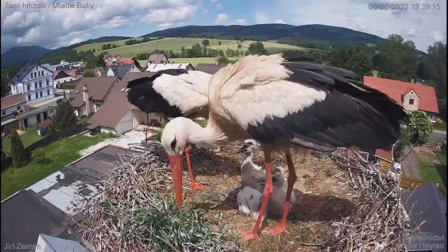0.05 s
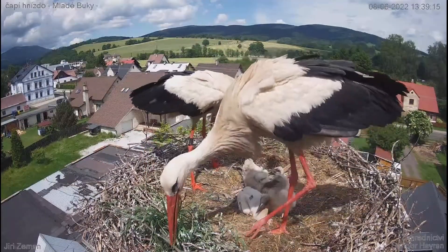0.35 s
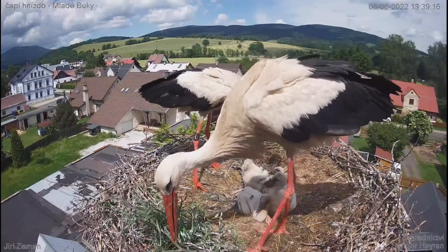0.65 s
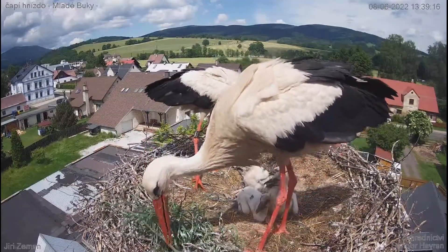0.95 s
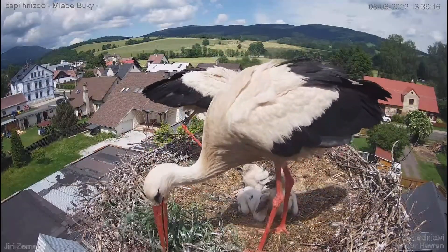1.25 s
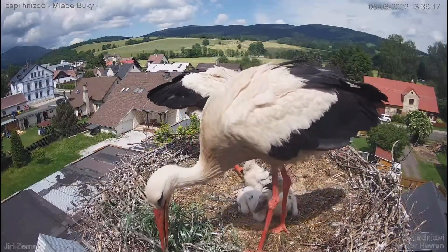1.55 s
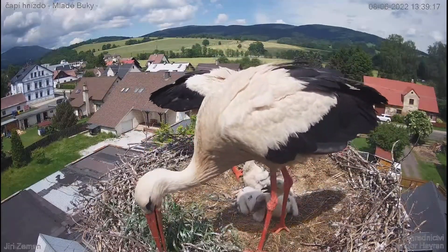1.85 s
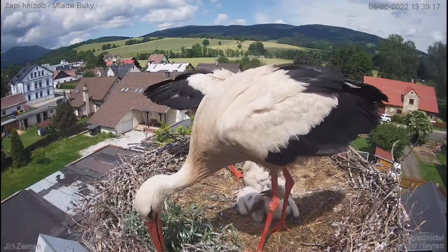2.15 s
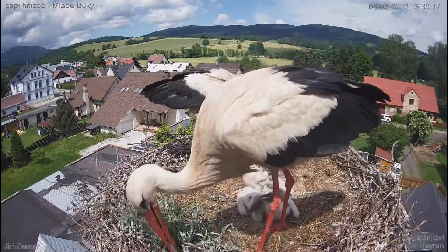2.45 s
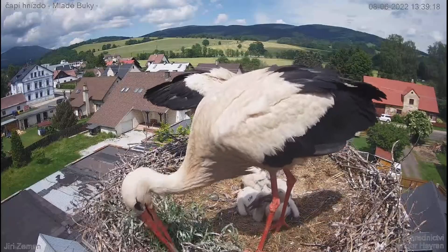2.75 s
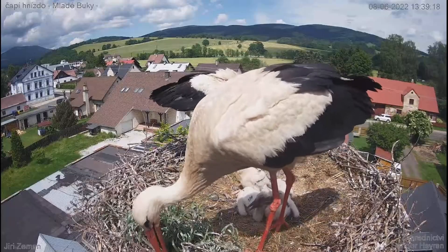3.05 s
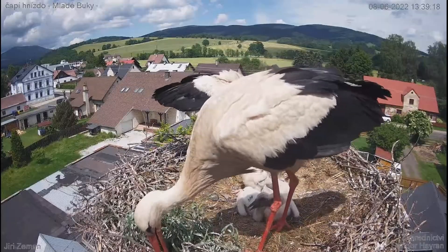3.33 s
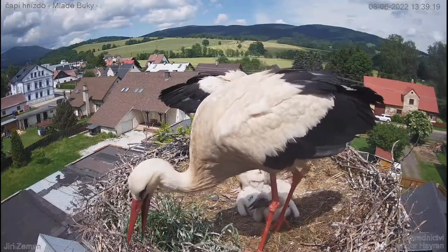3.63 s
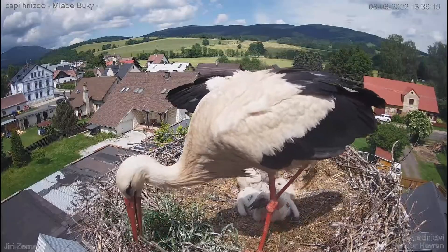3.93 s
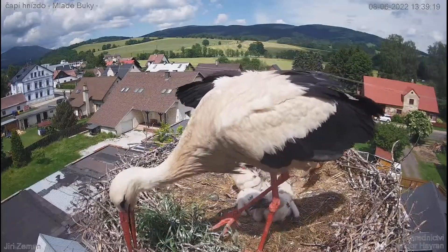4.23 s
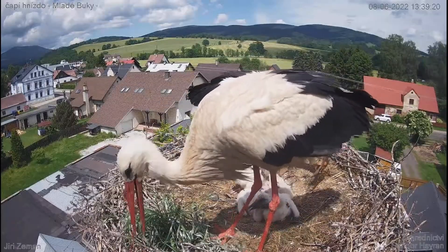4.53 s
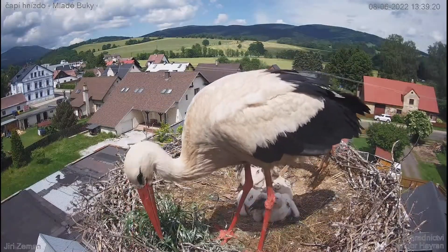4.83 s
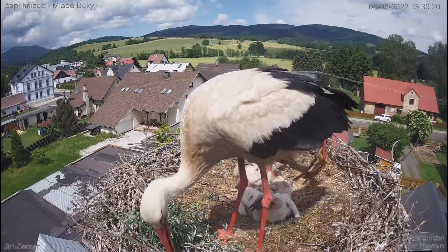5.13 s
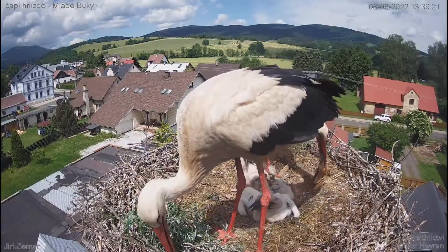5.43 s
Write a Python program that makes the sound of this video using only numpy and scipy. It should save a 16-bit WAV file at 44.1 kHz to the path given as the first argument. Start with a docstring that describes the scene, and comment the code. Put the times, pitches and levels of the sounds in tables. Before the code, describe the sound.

A steady outdoor hiss surrounds a nest heard from close by. A stork chick squeaks and rasps once, then distant songbirds repeat quiet scraps of song. Midway, the adult birds stir the dry straw, cracking twigs and making a brief low rumble. Short, high chick squeaks follow one after another, mixed with throaty creaks, dry clicks and light rustling, and grow busiest near the end.

```python
"""Stork chicks squeak in a nest high above a village: thin whistles from a fluttering skin in the throat,
one harsh rasp, and low creaks, some with clicks, as the throat goes slack. The adults shift about, rustling
straw, snapping twigs and bumping the nest. Small birds whistle further off, echoed by the houses, over
the steady hiss of the open air."""
import sys
import numpy as np
from scipy import signal
from scipy.fft import rfft, irfft
from scipy.io import wavfile
from scipy.ndimage import uniform_filter1d, map_coordinates

SR = 44100
rng = np.random.default_rng(int(sys.argv[2]) if len(sys.argv) > 2 else 0)


def unload_audio(sound):
    """Save the sound as a 16-bit wav file, at the path given as the first command line argument."""
    columns = np.transpose(np.atleast_2d(sound))
    # keep every value between -1 and 1, then stretch to whole-number steps
    steps = np.round(np.clip(columns, -1, 1) * 32767)
    wavfile.write(sys.argv[1], SR, steps.astype(np.int16))


N = 250488
T = np.arange(N) / SR
TOP_HZ = 15900


def undb(db):
    """Turn decibels into a number to multiply by."""
    return 10 ** (np.asarray(db) / 20)


def unit(x):
    """Scale a sound to an average power of 1."""
    return x / np.sqrt(np.mean(x ** 2) + 1e-20)


def add(out, start_s, x):
    """Mix x into out from the given time."""
    i = max(int(start_s * SR), 0)
    out[i:i + len(x)] += x[:max(N - i, 0)]


def wander(n, rate):
    """A smooth random drift, about 1 in size, with about rate turns a second."""
    knots = rng.standard_normal(int(n * rate / SR) + 4)
    return map_coordinates(knots, [1 + np.arange(n) * rate / SR], order=2, mode="nearest")


def resonate(x, hz, width_hz):
    """Let x ring around one pitch; a narrower width rings longer."""
    hz = min(hz, .42 * SR)
    return signal.lfilter(*signal.iirpeak(hz, hz / min(width_hz, .3 * SR), SR), x)


def ring(x, peaks):
    """Let x ring a body that has several pitches of its own."""
    return sum(undb(db) * resonate(resonate(x, hz, width), hz, width) for hz, width, db in peaks)


def colour(x, points):
    """Turn lows and highs up or down along (f/Hz, level/dB) points."""
    hz, db = np.transpose(points)
    f = np.maximum(np.fft.rfftfreq(len(x), 1 / SR), 1)
    return irfft(rfft(x) * undb(np.interp(np.log(f), np.log(hz), db)), len(x))


def band(x, lo_hz, hi_hz):
    """Keep what lies between two frequencies."""
    return signal.sosfilt(signal.butter(3, [lo_hz, min(hi_hz, .45 * SR)], "band", fs=SR, output="sos"), x)


def echoes(x, fade_s, delay_s):
    """A blur of reflections that drops by 60 dB in fade_s."""
    t = T[:SR]
    tail = rng.standard_normal(SR) * undb(-60 * t / fade_s) * (t > delay_s)
    return signal.fftconvolve(x, tail / np.linalg.norm(tail))[:N]


def arch(rise_s, fall_s, start_hz, crest_hz, end_hz):
    """A call's gliding pitch, and the place in the call: -1 at the start, 0 at the crest, 1 at the end."""
    t = np.arange(-rise_s, fall_s, 1 / SR)
    place = t / np.where(t < 0, rise_s, fall_s)
    edge_hz = np.where(t < 0, start_hz, end_hz)
    return crest_hz * (edge_hz / crest_hz) ** np.sin(np.pi / 2 * place) ** 2, place


# How the breeze rises and falls: t/s, level/dB
BREEZE_LEVELS = [(0.0, -44), (0.19, -45), (0.52, -50), (0.76, -51.5), (2.14, -51), (2.37, -47.5),
                 (2.8, -46), (4.02, -47.5), (4.19, -47.5), (4.44, -44.5), (4.7, -46.5), (5.03, -46.5),
                 (5.27, -44), (5.68, -46)]
# Lows and highs of the open air: f/Hz, level/dB
AIR_TONE = [(13, -31), (22, -8), (52, 1), (198, -10), (239, -7.5), (324, 0), (530, -1), (918, 0.5),
            (1870, -3.5), (2090, -2.5), (4040, -10.5), (4900, -7.5), (9720, -29), (13900, -29),
            (15500, -36)]

def air(boost_db=.5, flicker_db=1.33):
    """Outdoor hiss swells with the breeze; each octave flickers on its own."""
    breeze_db = np.interp(T, *np.transpose(BREEZE_LEVELS))
    mean_db = breeze_db.mean()
    hiss = colour(rng.standard_normal(N), AIR_TONE)
    spectrum = rfft(hiss / np.std(band(hiss, 250, 1300)))
    octave = np.log2(np.clip(np.fft.rfftfreq(N, 1 / SR), 2 ** 5, 2 ** 14))
    out = 0
    for k in range(5, 15):
        part = irfft(spectrum * np.maximum(1 - abs(octave - k), 0), N)
        follow = np.interp(k, [6, 9], [.96, 1])  # the bass swells a little less
        out = out + part * undb(follow * (breeze_db - mean_db) + flicker_db * wander(N, 18))
    return out * undb(mean_db + boost_db)


# The birds stir, each rustle swelling and dying away: loudest at t/s, level/dB, swell/s
STIRS = [ (.06, -48, .025), (.21, -45.5, 0.076), (.45, -53.5, .12), (.82, -47, .03), (1.0, -47, 0.045),
         (2.54, -37, 0.033), (2.8, -46, 0.061), (2.93, -40, 0.059), (3.28, -45, 0.039), (3.6, -44, .02),
         (3.93, -49, 0.12), (4.33, -47.5, 0.14), (4.55, -44, 0.087), (5.09, -45, 0.074), (5.36, -55, .06), ]
# Lows and highs of dry straw: f/Hz, level/dB
STRAW_TONE = [(1000, -0.5), (2500, 5), (4000, 9.5), (6300, 4.5), (8000, 1), (10000, -6.5), (15000, -14)]

def straw(cracks_per_s=1500, rest_db=-56):
    """Stalks crack in tiny clumps, never quite still; the packed bedding crunches dully below."""
    cracks, clumps_db = 0, 1.5 * wander(N, 50)
    for stalk_hz in ((800, 3200), (3200, 6500), (6500, 15500)):  # thick, medium, fine
        size_db = 4.3 * np.minimum(rng.exponential(size=N), 4)
        breaks = (rng.random(N) < cracks_per_s / SR) * rng.choice([-1, 1], N)
        cracks = cracks + band(breaks * undb(size_db + clumps_db), *stalk_hz)
    scattered = undb(-3) * echoes(cracks, fade_s=.019, delay_s=0)
    rustle = unit(colour(cracks + scattered, STRAW_TONE))
    bedding = undb(-5.5) * unit(band(rng.standard_normal(N), 260, 1410))
    stir = np.sqrt(sum((undb(db) * np.exp(-abs(T - s) / swell_s)) ** 2 for s, db, swell_s in STIRS))
    return rustle * np.hypot(stir, undb(rest_db)) + bedding * stir


def squeak_shape(rise_s, fall_s, lead_s, pitches, db, swell_db=6, fade_db=16, catch_db=9.5):
    """Pitch and loudness of a squeak: it starts weak, jumps as the voice catches, swells and fades."""
    hz, place = arch(rise_s, fall_s, *pitches)
    t = T[:len(hz)]
    soft_ends = np.clip(np.minimum(t, t[-1] - t) / .0017, 0, 1)
    caught = np.clip((t - rise_s + lead_s) / .0015, 0, 1)
    drop_db = np.where(place < 0, swell_db, fade_db) * abs(place) ** 1.08
    return hz, undb(db - drop_db - catch_db * (1 - caught)) * soft_ends


# Where a nearly closed bill rings: f/Hz, width/Hz, level/dB
BILL_PEAKS = [(2700, 410, 1.5), (3660, 1400, -5.5), (6000, 1170, -1), (7800, 400, -7)]

def squeak(hz, gain, overtone_db, hoarse, hiss_db, slack_hz=2200, buzz_hz=680):
    """A thin skin in the throat whistles, fluttering when low or weak; air hisses in the bill."""
    n = len(hz)
    slack = 1 - .7 * gain / gain.max()
    rough = hoarse * slack * (1 + (slack_hz / hz) ** 2) ** .5
    phase = 2 * np.pi * np.cumsum(hz * (1 + .16 * rough * wander(n, 1500))) / SR
    overtones = sum(undb(overtone_db - drop_db) * np.sin(k * phase) * (k * hz < TOP_HZ)
                    for k, drop_db in ((2, 0), (3, 15)))
    tone = (np.sin(phase) + overtones) * np.exp(1.2 * hoarse * slack * wander(n, 350))
    # a slower shake splits the whistle wherever the effort drops
    buzz = np.sin(2 * np.pi * np.cumsum(buzz_hz * (1 + .2 * wander(n, 200))) / SR)
    tone *= 1 + 3.2 * hoarse * slack ** 2 * buzz
    puffs = rng.standard_normal(n) * (1 + .6 * np.sin(phase)) * undb(3 * wander(n, 300))
    hiss_gain = undb(hiss_db) * gain.mean() * (gain / gain.mean()) ** .27  # steadier than the whistle
    return unit(tone) * gain + unit(ring(puffs, BILL_PEAKS)) * hiss_gain


# Squeaks, loudest at the crest; lead is how long before it the voice catches: crest t/s, rise/s, fall/s,
# lead/s, start f/Hz, crest f/Hz, end f/Hz, level/dB, overtone/dB, hoarseness/0-1, bill hiss/dB
CHICK_SQUEAKS = [ (.064, 0.037, .014, .005, 4200, 4200, 3900, -34, -30, 0.57, -4),
                 (.09, 0.011, 0.034, 0.0072, 3550, 3750, 3380, -35, -30, 0.38, -14),
                 (2.714, 0.031, 0.037, 0.0088, 2200, 2650, 1393, -26, -8, 0.28, -13),
                 (3.235, 0.044, .016, .004, 2400, 5150, 4900, -30.5, -9, 0.6, -13),
                 (3.259, .011, .028, 0.0045, 4120, 3850, 2000, -28, -15, 0.56, -10.5),
                 (3.488, .018, 0.03, .01, 4500, 4850, 3820, -42, -29, 0.25, -25),
                 (3.874, 0.028, 0.015, 0.0091, 5410, 5650, 4660, -38, -33, 0.27, -21),
                 (4.238, 0.047, .038, 0.0088, 2850, 4750, 2750, -26, -18, .3, -21),
                 (4.541, .024, 0.041, 0.016, 2570, 2700, 2295, -26.5, -3.5, 0.38, -6),
                 (5.106, 0.051, 0.043, .022, 2200, 2530, 1530, -31, -21, 0.4, -1.5),
                 (5.236, .038, .04, .007, 4600, 4950, 4380, -24.5, -17, 0.43, -17),
                 (5.277, .02, 0.021, .016, 3930, 3050, 2570, -30.5, -10, 0.65, -10),
                 (5.323, .034, 0.042, 0.028, 2544, 3410, 1700, -22.5, -2, 0.35, -5),
                 (5.567, 0.018, .02, .014, 4620, 4900, 4350, -42.5, -27, .2, -25),
                 (5.646, .028, 0.098, .022, 2710, 3200, 3720, -33.5, -27, 0.3, -22), ]

def squeaks():
    """The chicks whistle one short call after another."""
    out = np.zeros(N)
    for s, rise_s, fall_s, lead_s, *pitches, db, overtone_db, hoarse, hiss_db in CHICK_SQUEAKS:
        hz, gain = squeak_shape(rise_s, fall_s, lead_s, pitches, db)
        add(out, s - rise_s, squeak(hz, gain, overtone_db, hoarse, hiss_db))
    return out


# Where a dry click rings: f/click pitch, width/click pitch, level/dB
CLICK_PEAKS = [(.6, 0.17, 20), (1, 0.52, 35), (1.45, 0.17, -19)]
# Sharp dry clicks: twigs snapping, and clicks in the chicks' throat creaks:
# t/s, level/dB, pitch f/Hz, fade/s, bright edge/dB
DRY_CLICKS = [ (.084, -36.5, 5650, 0.0068, -22), (.286, -39, 4000, 0.032, -19),
              (.825, -44.5, 7100, .03, -6), (1.508, -35.5, 4800, 0.017, -25),
              (2.492, -34.5, 4500, .016, -25), (2.528, -27.5, 5400, 0.018, -13),
              (2.753, -36.5, 5350, 0.02, -27), (2.831, -37, 4700, 0.029, -12),
              (2.898, -24, 4660, 0.0081, -6), (2.945, -36, 4200, 0.015, -15), (3.618, -39, 6360, .013, -3),
              (5.058, -31.5, 3960, .04, -31), (5.076, -34, 4900, .014, -25),
              (5.173, -29.5, 5200, 0.0053, -24), (5.184, -30, 5300, 0.0069, -27),
              (5.381, -21, 4870, 0.0068, -21), ]

def dry_clicks():
    """A twig snaps or a chick's throat clicks: a brief burst of noise that rings around one pitch."""
    out, t = np.zeros(N), T[:4096]
    for s, db, hz, fade_s, bright_db in DRY_CLICKS:
        burst = rng.standard_normal(len(t)) * undb(-60 * t / fade_s) * (1 - np.exp(-t / .00019))
        body = ring(burst, [(k * hz, width * hz, peak_db) for k, width, peak_db in CLICK_PEAKS])
        click = unit(body) + undb(bright_db) * unit(band(burst, 8500, 12600))
        add(out, s, undb(db) * click / np.std(click[:SR // 500]))
    return out + undb(-15) * echoes(out, fade_s=.027, delay_s=.0011)


# Where the throat and open bill ring: f/Hz, width/Hz, level/dB
THROAT_PEAKS = [(1670, 480, 2.5), (2850, 630, -0.5), (3176, 550, 3), (4130, 520, -1.5), (5720, 390, -6),
                (6830, 310, -11), (8470, 540, -11.5), (12500, 1300, -19.5)]

def rasp(db=-20.5, hold_s=.11, sag_db_per_s=54, release_db_per_s=750):
    """A harsh begging cry: uneven pulses and rushing air ring the throat."""
    hz, _ = arch(rise_s=.035, fall_s=.107, start_hz=1429, crest_hz=1569, end_hz=1220)
    n = len(hz)
    t = T[:n]
    fade_db = sag_db_per_s * t + release_db_per_s * np.maximum(t - hold_s, 0)
    gain = (1 - np.exp(-t / .0072)) * undb(db - fade_db)
    phase = 2 * np.pi * np.cumsum(hz * (1 + .135 * wander(n, 1400))) / SR
    pulses = unit(sum(np.cos(k * phase) for k in range(1, 7)))
    breath = (pulses + .62 * rng.standard_normal(n)) * undb(1.5 * wander(n, 500))
    voice = ring(breath, THROAT_PEAKS)
    # steady air pressure evens out the loudness from moment to moment
    return voice / np.sqrt(uniform_filter1d(voice ** 2, size=350)) * gain


def whistle(length_s, start_hz, middle_hz, end_hz, db, waver=.0082, flicker_db=2):
    """A songbird's pure note, bent through three pitches."""
    n = int(length_s * SR)
    bend = np.polyfit([0, .5, 1], [start_hz, middle_hz, end_hz], 2)
    hz = np.polyval(bend, np.linspace(0, 1, n)) * (1 + waver * wander(n, 266))
    gain = signal.windows.tukey(n, .5) * undb(db + flicker_db * wander(n, 86))
    return np.sqrt(2) * np.sin(2 * np.pi * np.cumsum(hz) / SR) * gain


# Single notes of far birds: t/s, length/s, start f/Hz, middle f/Hz, end f/Hz, level/dB
LONE_NOTES = [ (0.432, .11, 4400, 4330, 4220, -51), (0.513, 0.086, 4220, 4115, 4070, -46.5),
              (.507, .055, 4150, 3630, 3500, -49), (1.58, .06, 3700, 3420, 3360, -54.5),
              (1.898, 0.21, 4160, 3990, 4010, -47), (2.615, 0.027, 3690, 3480, 3450, -49),
              (3.14, 0.063, 2087, 2050, 1970, -49), (3.539, 0.173, 2596, 2637, 2606, -47),
              (3.942, 0.028, 4450, 4200, 4070, -48), (4.084, .011, 4400, 4920, 5200, -45),
              (4.441, 0.059, 4200, 3490, 3870, -45.5), ]
# Three scraps of song: same columns, with time and level counted from those of each repeat
WARBLE_NOTES = [(-.012, 0.0123, 4400, 5020, 5900, -4.5), (0, 0.024, 4070, 3410, 3300, -4),
                (.024, .017, 3700, 3450, 3180, -3.5), (.042, .017, 3400, 3600, 3600, -3),
                (.06, 0.016, 3520, 3610, 3420, 0)]
SLUR_NOTES = [(0, .06, 6620, 6670, 7300, 0), (.055, 0.062, 7100, 7250, 7200, -5)]
CHIME_NOTES = [(0, 0.03, 5510, 5270, 5400, 1.5), (.028, 0.02, 4130, 3820, 3700, -3.5),
               (.04, .03, 5400, 5330, 5280, -6), (.047, 0.0296, 3994, 3686, 4400, -1.5)]
# Their repeats: t/s, level/dB
WARBLE_REPEATS = [(.661, -42.5), (.792, -44), (.926, -43)]
SLUR_REPEATS = [(1.06, -52.5), (1.381, -56)]
CHIME_REPEATS = [(2.099, -43.5), (2.227, -42.5), (2.346, -41), (2.484, -40.5)]

def songbirds():
    """Small birds whistle single notes and repeat scraps of song; the houses echo them."""
    out = np.zeros(N)
    for s, *shape in LONE_NOTES:
        add(out, s, whistle(*shape))
    songs = (WARBLE_NOTES, WARBLE_REPEATS), (SLUR_NOTES, SLUR_REPEATS), (CHIME_NOTES, CHIME_REPEATS)
    for notes, repeats in songs:
        for start_s, db in repeats:
            for s, *shape in notes:
                add(out, start_s + s, undb(db) * whistle(*shape))
    return out + undb(-6) * echoes(out, fade_s=.84, delay_s=.0095)


# Soft steps on the nest: t/s, level/dB, fade/s
NEST_BUMPS = [(2.52, -51.5, .15), (2.765, -54, 0.085), (2.851, -56, 0.13), (2.918, -52, 0.16),
              (3.172, -58, 0.17), (3.67, -52, 0.19), ]

def bumps(hz=45, width_hz=55):
    """Steps shake the nest platform into a short low rumble."""
    out, t = np.zeros(N), T[:SR // 3]
    for s, db, fade_s in NEST_BUMPS:
        push = rng.standard_normal(len(t)) * undb(-60 * t / fade_s)
        shake = resonate(resonate(push, hz, width_hz), hz, 3 * width_hz)
        add(out, s, undb(db) * shake / np.std(shake[:SR // 20]))
    return out


# Where a slack throat rings: f/Hz, width/Hz, level/dB
SLACK_THROAT_PEAKS = [(221, 120, -0.5), (660, 560, 1.5), (1290, 770, -10.5)]
# Low creaks after some of the stronger squeaks: t/s, length/s, level/dB, bill rattle/dB
THROAT_CREAKS = [(2.74, 0.048, -38.5, -9), (3.273, 0.044, -40.5, -5), (4.256, .055, -43, -7),
                 (4.567, .045, -38.5, -4), (5.14, 0.058, -35.5, -1.5)]

def creaks(flaps_per_s=210, puff_s=.0015):
    """Uneven flaps let through puffs of air that ring the slack throat and rattle in the bill."""
    out = np.zeros(N)
    for s, length_s, db, bill_db in THROAT_CREAKS:
        n = int(length_s * SR)
        cycle = np.cumsum(flaps_per_s * np.exp(.3 * wander(n, 200))) / SR % 1
        puffs = rng.standard_normal(n) * np.exp(-cycle / (flaps_per_s * puff_s))
        throat = unit(ring(puffs, SLACK_THROAT_PEAKS))
        bill = undb(bill_db) * unit(ring(puffs, BILL_PEAKS))
        add(out, s, undb(db) * (throat + bill) * signal.windows.tukey(n, .5))
    return out


def chicks():
    """The chicks' squeaks, creaks and rasp, with short echoes from nest and roof."""
    calls = squeaks() + creaks()
    calls = band(band(calls, 127, 9300), 150, 9300)  # the nearly closed bill muffles the top
    add(calls, start_s=.3, x=rasp())
    return calls + undb(-10) * echoes(calls, fade_s=.17, delay_s=.00074)


def scene():
    """Nest, birds and air heard from one spot."""
    return (chicks() + songbirds() + dry_clicks() + straw() + bumps() + air())[None]


def record(dry):
    """Cut away the very highest treble."""
    return signal.sosfilt(signal.ellip(10, .2, 70, TOP_HZ, fs=SR, output="sos"), dry)


dry = scene()
out = record(dry)
unload_audio(out)
```